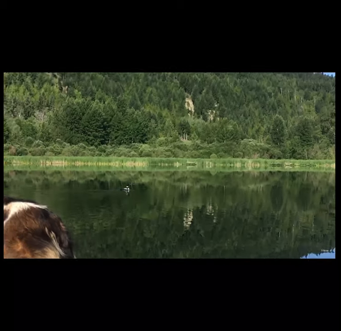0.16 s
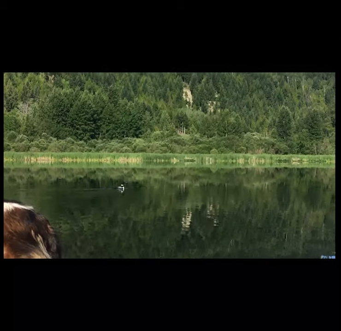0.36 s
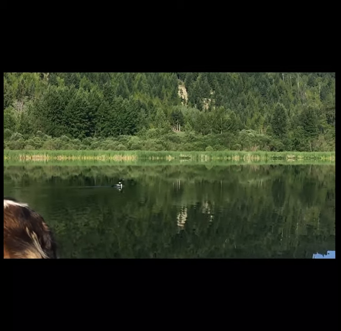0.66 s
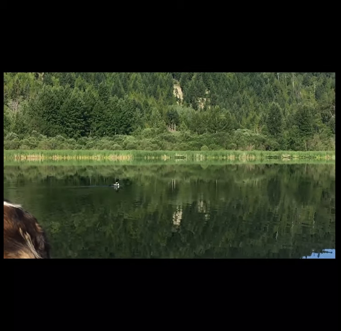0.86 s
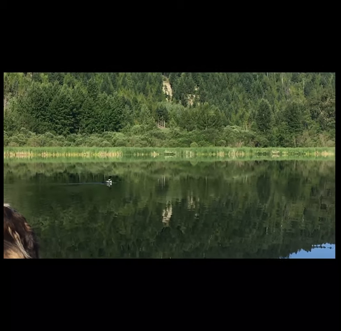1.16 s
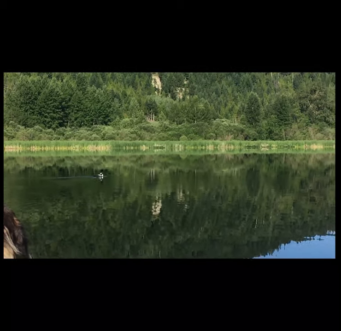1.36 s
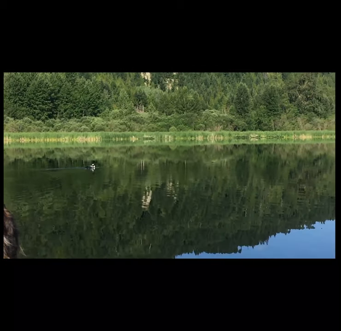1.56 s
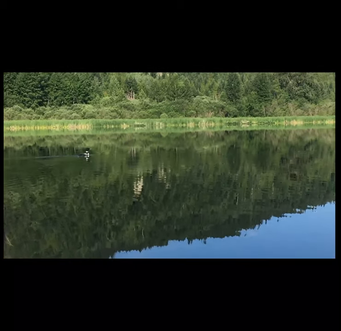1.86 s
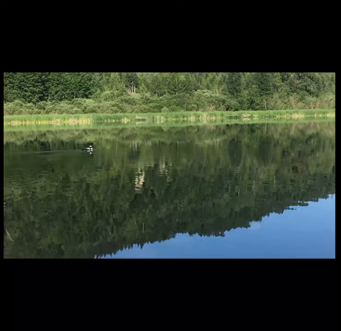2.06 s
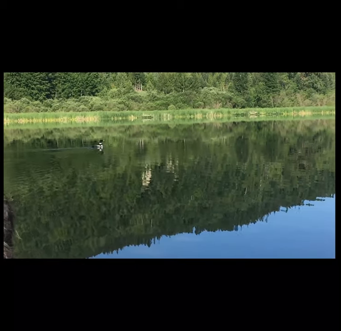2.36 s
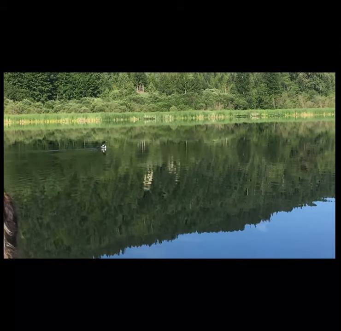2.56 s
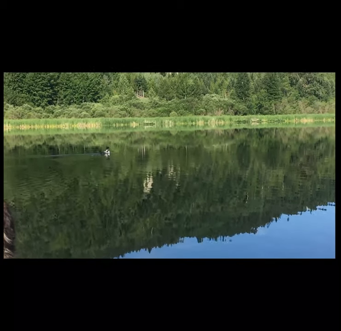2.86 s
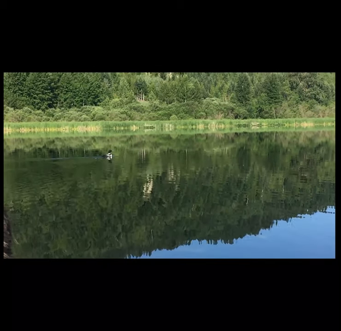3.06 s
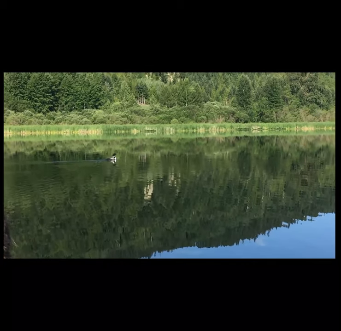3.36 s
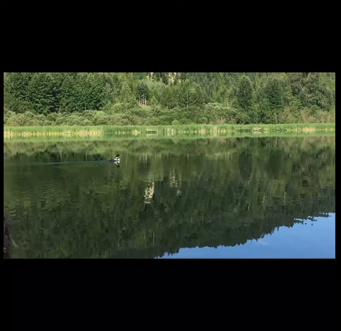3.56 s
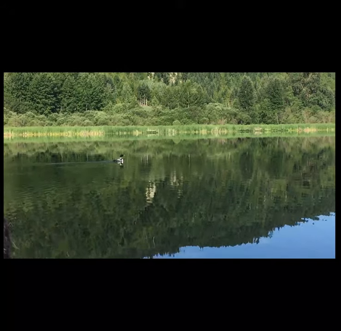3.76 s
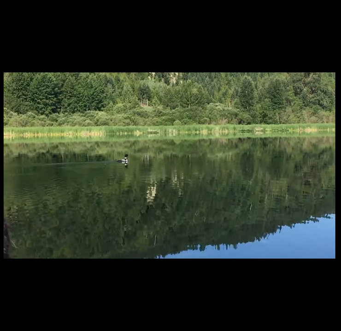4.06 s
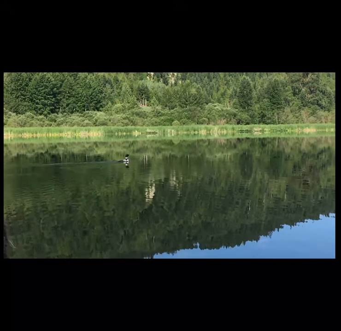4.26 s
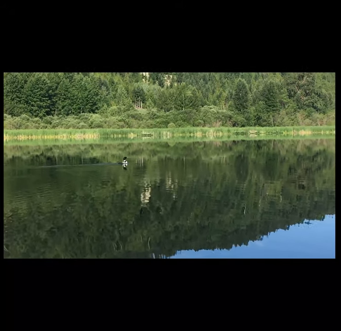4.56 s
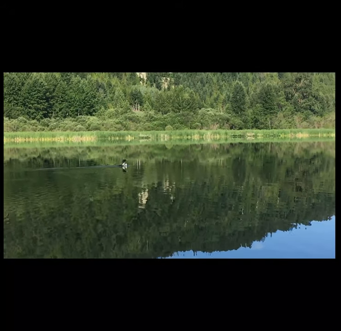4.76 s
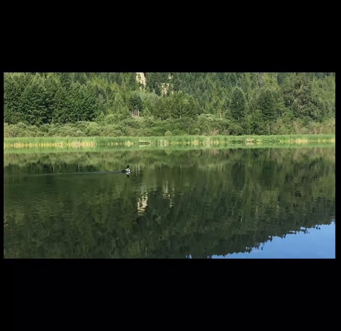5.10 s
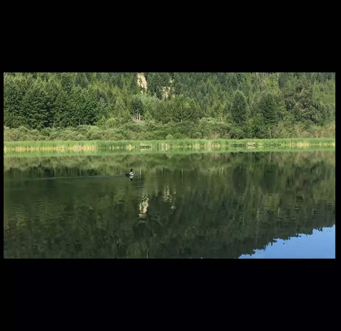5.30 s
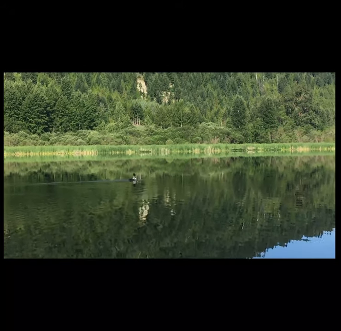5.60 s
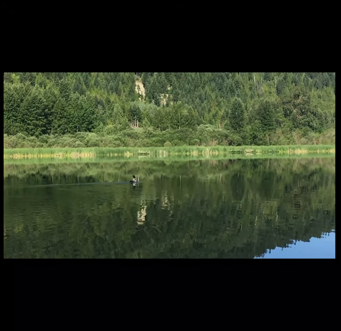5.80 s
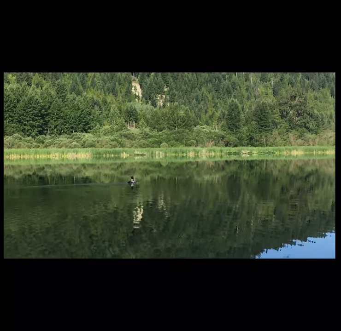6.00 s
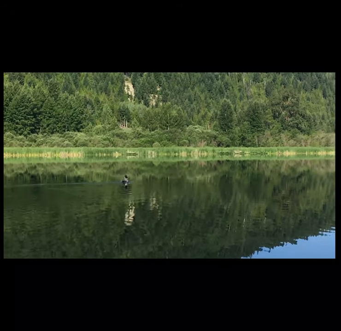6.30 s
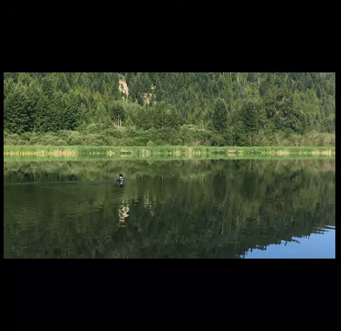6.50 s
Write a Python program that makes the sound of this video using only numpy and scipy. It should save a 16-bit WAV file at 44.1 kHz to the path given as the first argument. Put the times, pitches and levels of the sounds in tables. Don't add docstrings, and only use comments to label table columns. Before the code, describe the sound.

A far loon is already quavering as a dog scrambles at arm's length on a wooden boat, with clicks, rustle and hull thumps. A close loon then breaks from low pulsing into a loud, high tremolo, ending in a gulp. Far birds reply, and the exchange repeats twice more before a last close call begins. Soft lake hush, faint ticking and shore-bird twitters sit beneath; the hills return a long, faint echo.

```python
import sys
import numpy as np
from scipy import signal
from scipy.fft import rfft, irfft
from scipy.io import wavfile
from scipy.ndimage import uniform_filter1d

SR = 44100
rng = np.random.default_rng(int(sys.argv[2]) if len(sys.argv) > 2 else 0)


def attenuation_scalar(level_db):
    decades = np.asarray(level_db, float) / 20
    return 10 ** decades


def store_wav(level_fs):
    pcm = np.round(np.clip(np.atleast_2d(level_fs), -1, 1) * 32767)
    wavfile.write(sys.argv[1], SR, pcm.T.astype(np.int16))


N = 292824


def shape(points, hz):
    at, db = np.transpose(points)
    return np.interp(np.log(hz + 1), np.log(at), db)


def coloured(points):
    hz = np.arange(N // 2 + 1) * SR / N
    x = irfft(rfft(rng.standard_normal(N)) * attenuation_scalar(shape(points, hz)), N)
    return x / x.std()


def band(lo_hz, hi_hz):
    sos = signal.butter(2, [lo_hz, hi_hz], "bandpass", fs=SR, output="sos")
    x = signal.sosfilt(sos, rng.standard_normal(N))
    return x / x.std()


def walk(rate, size=N):
    k = int(SR / rate)
    held = np.repeat(rng.standard_normal(size // k + 1), k)
    return 1.3 * uniform_filter1d(uniform_filter1d(held, k), k)[:size]


def add(out, s, x):
    i = int(s * SR)
    out[i:i + len(x)] += x[:len(out) - i]


def ring(hz, t60):
    t = np.arange(int(t60 * SR)) / SR
    return np.sin(2 * np.pi * hz * t) * np.exp(-np.log(1000) * t / t60)


# pitch_hz, width_hz, level_db
FAR_HUM = [(58, 10, -71.5), (164.4, 5.2, -70), (229.8, 18, -72.5)]


def far_hum():
    return sum(attenuation_scalar(db) * band(hz - width / 2, hz + width / 2) for hz, width, db in FAR_HUM)


HISS_DB, FLICKER_DB = -73, 0.7
# freq_hz, density_db (per Hz)
HIGH_HISS = [(1650, -31), (2800, -13), (3160, 1), (3600, -4), (3870, -2), (4490, 1), (4900, -8),
             (5260, -6), (7860, -12), (8880, -10.5), (10400, -15.5), (15500, -14.5)]


def high_hiss():
    return attenuation_scalar(HISS_DB + FLICKER_DB * walk(5.8)) * coloured(HIGH_HISS)


LAKE_DB, LAP_DB = -60.5, 2.2
# freq_hz, density_db (per Hz)
LAKE_HUSH = [(15, -16.5), (25, -6.5), (71, 3), (129, -5), (240, -4), (421, -19.5), (784, -14.5),
             (920, -22.5), (1020, -9.5), (1190, -9.5), (1350, -21.5), (1600, -20.5), (2250, -19.5),
             (2800, -27), (6600, -120)]


def lake_hush():
    spectrum, hz = rfft(coloured(LAKE_HUSH)), np.arange(N // 2 + 1) * SR / N
    out, swell = 0, walk(2.327)
    for lo in 20 * 2.0 ** np.arange(10):
        octave = irfft(spectrum * ((hz >= lo) & (hz < 2 * lo)), N)
        lap_db = LAP_DB * (lo < 400) * (0.99 * swell + 1.1 * walk(5.9))
        out = out + octave * attenuation_scalar(lap_db + FLICKER_DB * walk(5.3))
    return attenuation_scalar(LAKE_DB) * out


TRILL_DB, TRILL_NOTE_S = -65, 0.017
# start_s, note_count, spacing_s, from_hz, to_hz
TRILLS = [
    (3.236, 11, .0272, 4300, 3050),
    (3.29, 9, .0275, 3250, 2850),
    (5.847, 6, .0235, 4300, 3400),
    (5.99, 7, .019, 4400, 3300),
]
# start_s, from_hz, to_hz, length_s, level_db
CHIPS = [(3.625, 4475, 4390, 0.044, -65), (4.79, 3400, 3630, 0.018, -68), (4.862, 3370, 3520, 0.018, -68),
         (4.925, 4800, 3090, 0.036, -61.5), (5.075, 3400, 3450, 0.017, -68),
         (5.135, 4630, 3600, 0.017, -64.5), (5.34, 3450, 3643, 0.015, -71), (5.412, 3400, 3500, .02, -71),
         (5.475, 4720, 3040, 0.04, -63.5), (5.628, 3260, 3450, 0.024, -63), (5.685, 4550, 3560, 0.026, -65),
         (5.885, 3200, 2960, 0.079, -60), (6.018, 4410, 4330, 0.022, -59.5), (6.022, 2870, 2710, 0.03, -61),
         (6.045, 3700, 2820, 0.015, -62), (6.142, 4670, 4380, 0.014, -64)]


def songbird():
    out = np.zeros(N)
    notes = []
    for s, count, gap, from_hz, to_hz in TRILLS:
        notes += [(s + k * gap, from_hz, to_hz, TRILL_NOTE_S, TRILL_DB) for k in range(count)]
    notes += CHIPS
    for s, from_hz, to_hz, length, db in notes:
        vary_hz, vary_db = rng.standard_normal(2)
        u = np.linspace(0, 1, int(length * SR))
        hz = (from_hz + (to_hz - from_hz) * u) * (1 + 0.015 * vary_hz)
        whistle = np.sin(np.pi * u ** 1.12) * np.sin(2 * np.pi * np.cumsum(hz) / SR)
        add(out, s, attenuation_scalar(db - 2 + 0.98 * vary_db) * whistle)
    out = out * attenuation_scalar(3 * walk(250))
    t = np.arange(SR // 4) / SR
    leaves = attenuation_scalar(-36) * np.exp(-t / 0.04) * rng.standard_normal(len(t))
    return out + signal.fftconvolve(out, leaves)[:N]


# start_s, peak_db
TICKS = [
    (0.5572, -52.5),
    (1.5631, -52),
    (2.5669, -51),
    (3.377, -52),
    (4.5757, -49),
    (5.5782, -52),
    (6.5818, -49),
]
# pitch_hz, level_db, t60_s
TICK_MODES = [(4500, 3, 0.022), (5670, 4, 0.0033), (6920, 3.5, 0.0078), (9250, -9.5, 0.0049)]


def ticks():
    out = np.zeros(N)
    for s, db in TICKS:
        for hz, mode_db, t60 in TICK_MODES:
            add(out, s, attenuation_scalar(db + mode_db - 7) * ring(hz, t60))
    return out


WHISK_S, WHISK_DB, WHISK_HZ = 6.09, -70.5, 11800


def whisk():
    gust = np.exp(-((np.arange(N) / SR - WHISK_S) / 0.015) ** 2)
    air = band(0.94 * WHISK_HZ, 1.08 * WHISK_HZ) + 0.8 * band(5000, 14000)
    return attenuation_scalar(WHISK_DB) * gust * air


SHIFT_ATTACK_DB_PER_S, FUR_FADE_DB_PER_S, HULL_FADE_DB_PER_S = 702.5, 300, 398.5
FUR_BODY_DB = 18
# freq_hz, density_db (per Hz)
FUR = [(120, -37.5), (200, -11), (478, -2), (624, -12), (990, -6), (1270, -6.5), (1880, -6), (2630, -20.5),
       (4330, -13.5), (14000, -50)]
# start_s, length_s, fur_db, hull_db
SHIFTS = [
    (0, .11, -68, -47.5),
    (0.134, .02, -73.5, -42),
    (0.2, .015, -65, -38),
    (0.214, 0.12, -63, -45),
    (0.407, 0.079, -63.5, -47),
    (0.55, 0.0098, -70.5, -36),
]


def dog_shifting():
    t = np.arange(N) / SR
    start, length, fur_db, hull_db = np.transpose(SHIFTS)[:, :, None]
    attack_db = SHIFT_ATTACK_DB_PER_S * np.maximum(start - t, 0)
    since_end = np.maximum(t - start - length, 0)
    rustle_db = np.max(fur_db - attack_db - FUR_FADE_DB_PER_S * since_end, axis=0)
    rumble_db = np.max(hull_db - attack_db - HULL_FADE_DB_PER_S * since_end, axis=0)
    grain_db = 1.68 * walk(200) + 2 * walk(42.1)
    fur = coloured(FUR) * attenuation_scalar(rustle_db + grain_db + FUR_BODY_DB)
    return fur + band(18, 145) * attenuation_scalar(rumble_db + 0.81 * walk(33.9))


HULL_T60_S, THUMP_HZ, THUMP_T60_S = 0.042, 58.3, 0.27
# start_s, peak_db, pitch_hz
CLAWS = [
    (0.0074, -29.5, 1500),
    (0.06, -39, 1880),
    (0.1164, -46, 1340),
    (0.203, -29, 2080),
    (0.2254, -33.5, 1840),
    (0.308, -33, 1420),
    (0.4051, -34, 1470),
    (0.4699, -22, 1660),
]
# start_s, peak_db, pitch_hz, thump_db (relative to the peak)
PAWS = [(0.018, -34.5, 535, -2), (0.148, -42.5, 450, 8.5), (0.204, -32, 296, -7), (0.343, -39.5, 260, -1.5),
        (0.395, -44.5, 620, 6.5), (0.529, -38, 524, -18), (0.559, -40, 253, 3.5), (0.64, -50.5, 518, -16.5),
        (0.705, -46, 274, -19), (0.929, -38.5, 314, -13), (1.096, -47.5, 278, -17),
        (1.175, -45.5, 545, -0.5), (1.311, -58, 250, 9), (1.681, -42, 504, -4.5), (2.179, -47, 441, -14),
        (2.263, -51, 330, -1.5), (2.292, -41, 320, -16.5), (2.671, -53.5, 298, -19),
        (2.759, -45.5, 244, -26), (3.829, -57, 244, 6.5)]


def paws():
    out = np.zeros(N)
    for s, db, hz in CLAWS:
        add(out, s, attenuation_scalar(db) * ring(hz, 0.01))
    for s, db, hz, thump_db in PAWS:
        add(out, s, attenuation_scalar(db) * ring(hz, HULL_T60_S))
        add(out, s, attenuation_scalar(db + thump_db) * ring(THUMP_HZ, THUMP_T60_S))
    return out


SHORE_DB, SHORE_T60_S = -27.5, 0.22
HILL_DB, HILL_DELAY_S, HILL_T60_S = -35, 0.32, 3.23


def echoes(voices):
    t = np.arange(3 * SR) / SR
    shore = attenuation_scalar(SHORE_DB) * np.exp(-np.log(1000) * t / SHORE_T60_S) / np.sqrt(SHORE_T60_S * SR / 14)
    arrival = np.clip(t / HILL_DELAY_S, 0, 1) ** 2
    hill = attenuation_scalar(HILL_DB) * arrival * np.exp(-np.log(1000) * t / HILL_T60_S) / np.sqrt(SR / 4)
    return signal.fftconvolve(voices, (shore + hill) * rng.standard_normal(len(t)))[:N]


def swing(s, t, turn_hz, low):
    place = np.minimum(np.interp(t, s, np.arange(len(s))), len(s) - 1.001)
    step, u = place.astype(int), place % 1
    if not low:
        return step + 0.5 - 0.5 * np.cos(np.pi * u)
    rise = np.where(step == len(s) - 2, u, np.sin(np.pi * u / 2))
    return step + np.where(np.diff(turn_hz)[step] > 0, rise, 1 - np.cos(np.pi * u / 2))


def cut(turns, start, end, low):
    turns = sorted(turns)
    s, hz, db = np.transpose(turns)
    ends = np.array([start, end])
    ends_hz = np.interp(swing(s, ends, hz, low), np.arange(len(s)), hz)
    first, last = np.transpose([ends, ends_hz, np.interp(ends, s, db)])
    margin_s = 0.004
    return [first] + [turn for turn in turns if start + margin_s < turn[0] < end - margin_s] + [last]


DIP_CLIMB_HZ, CREST_CLIMB_HZ, EARLY_FALL_S, RISE_S = 36.8, 65.35, 0.0019, 0.056


def opening(row, voice, breaks):
    start, dip_s, dip_hz, db, swell_db = row
    end = min([s for s in breaks if dip_s < s < dip_s + 2 * RISE_S], default=dip_s + RISE_S)
    turns = [(end, voice["break_hz"], db + voice["break_db"] + swell_db / 2)]
    for back in range(3):
        s, crest_db = dip_s - back * voice["arch_s"], db - back * swell_db
        crest_s = s - voice["fall_s"] - back * EARLY_FALL_S
        crest_hz = dip_hz + voice["arch_hz"] - back * CREST_CLIMB_HZ
        turns += [(s, dip_hz - back * DIP_CLIMB_HZ, crest_db - voice["low_dip_db"]), (crest_s, crest_hz, crest_db)]
    return cut(turns, start, min(end, N / SR), True)


SWING_S, RISE_SHARE = 0.097, 0.52
TIRED_S, TIRED_HZ, TIRED_DB, TIRED_DIP_DB = 0.017, 121.6, 3, 7.5
TIRING_RATIO = 0.3
LAST_FALL_S, LINGER_DB, WARM_S = 0.045, 5, 0.28


def tremolo(row, voice):
    start, s, crest_hz, db, tiring = row
    drag, linger = tiring ** voice["drag"], voice["linger_s"] * (1 - tiring)
    dip_db = db - voice["high_dip_db"]
    end_hz, end_db = voice["trough_hz"] - voice["sag_hz"], dip_db - TIRED_DIP_DB - 2 * TIRED_DB * tiring
    end = s + LAST_FALL_S + linger
    turns = [(s + LAST_FALL_S, end_hz, end_db), (end + 0.005, end_hz + 1, end_db - LINGER_DB)]
    for back in range(7):
        left = TIRING_RATIO ** back
        gap = SWING_S + TIRED_S * drag * left
        warm_db = voice["warm_db"] * np.exp(-max(s - start, 0) / WARM_S)
        trough_hz = voice["trough_hz"] - voice["sag_hz"] * drag * left
        turns += [(s, crest_hz - TIRED_HZ * tiring * left, db - TIRED_DB * tiring * left - warm_db),
                  (s - gap * RISE_SHARE, trough_hz, dip_db - TIRED_DIP_DB * drag * left ** 2)]
        s = s - gap
    return cut(turns, start, end, False)


REST_HZ, GULP_RISE_DB_PER_S = 576.6, 200.5
GULP_START, GULP_SETTLE = 0.43, 0.25


def gulp(row, voice):
    start, s, end, hz, db = row
    fade_db = voice["gulp_db_per_s"] * (end - s)
    return [(start, REST_HZ + GULP_START * (hz - REST_HZ), db - GULP_RISE_DB_PER_S * (s - start)),
            (s, hz, db),
            ((s + end) / 2, REST_HZ + GULP_SETTLE * (hz - REST_HZ), db - 0.6 * fade_db),
            (end, REST_HZ, db - fade_db)]


def calls(low, high, gulps, voice):
    breaks = [row[0] for row in high]
    notes = [opening(row, voice, breaks) for row in low]
    notes += [tremolo(row, voice) for row in high]
    notes += [gulp(row, voice) for row in gulps]
    return sorted(notes, key=lambda note: note[0][0])


LOW_SLOPE_DB, HIGH_SLOPE_DB = 2.1, -2
EFFORT = 0.45
BEAK_HZ, BEAK_WIDTH_HZ, TREBLE_HZ = 2220, 570, 4180
PATCHY_DB = 2.5
FAR_DULL_DB, FAR_KEYNOTE_DB = -30, 1
KEYNOTE_HOLD = 0.52
# freq_hz, level_db
WINDPIPE = [(750, -6), (1150, 3), (1750, 3), (1900, -25), (2200, -9.5), (2450, -26), (2850, -60),
            (3400, -21.5), (3780, -38.5), (4330, -20.5), (4850, -45), (5280, -33.5), (5900, -47),
            (7200, -68)]


def partials(hz, slack_db, posture, low, far):
    stretch, bright_db, beak_db, treble_db = posture
    lead = 2 if low else 1
    slope_db = bright_db + far * FAR_DULL_DB + (LOW_SLOPE_DB if low else HIGH_SLOPE_DB)
    phase, tone = 2 * np.pi * np.cumsum(hz) / SR, 0
    for k in range(1, 10):
        part_db = shape(WINDPIPE, k * hz * stretch) - shape(WINDPIPE, lead * hz * stretch)
        if k > lead:
            part_db += (slope_db + EFFORT * slack_db) * (k - lead) ** 0.78
            part_db += beak_db * np.exp(-((k * hz - BEAK_HZ) / BEAK_WIDTH_HZ) ** 2)
            part_db += treble_db * (1 + np.tanh((k * hz - TREBLE_HZ) / 200)) / 2
            part_db += PATCHY_DB * (k > 2) * walk(25.3, size=len(hz))
        if k < lead:
            part_db += far * FAR_KEYNOTE_DB - KEYNOTE_HOLD * slack_db
        tone = tone + attenuation_scalar(uniform_filter1d(part_db, size=200)) * np.sin(k * phase + k * k / 3)
    if low:
        halves = np.sin(3 * phase / 2) + np.sin(5 * phase / 2) / 3
        tone = tone + attenuation_scalar(HALF_LINE_DB + 4 * walk(15, size=len(hz))) * halves
    return tone


REGISTER_BREAK_HZ, HALF_LINE_DB, ONSET_S = 920, -36, 0.011
CATCH_S, CATCH_DEPTH = 0.0036, 0.53
HICCUP_HZ, HICCUP_DB, HICCUP_S = 970, -8, 0.0068
CHOKE_S, CHOKE_DEPTH = 0.011, 0.55
CRACK_DB, CRACK_S = -18, 0.022
SHIMMER_DB, BREATH_DB = 0.45, -32.5
AIRFLOW_DB = -50


def loon(notes, postures, far):
    out, shimmer, breath = np.zeros(N), attenuation_scalar(SHIMMER_DB * walk(60)), band(54, 230)
    rasp, airflow = band(800, 1500), band(4000, 4700)
    top_db = max(row[2] for note in notes for row in note)
    for note, posture in zip(notes, postures):
        s, turn_hz, turn_db = np.transpose(note)
        t = np.arange(max(s[0] - ONSET_S / 2, 0), s[-1] + ONSET_S / 2, 1 / SR)
        low = turn_hz.mean() < REGISTER_BREAK_HZ
        breaks_up = low and turn_hz[-1] > turn_hz[-2]
        turn = np.arange(len(s))
        hz = np.interp(swing(s, t, turn_hz, low), turn, turn_hz)
        power = 1.5 if low else 2.4
        push = np.interp(swing(s, t, turn_hz, False), turn, attenuation_scalar(turn_db) ** power) ** (1 / power)
        tone = partials(hz, 20 * np.log10(push) - top_db, posture, low, far)
        if low:
            slope = np.diff(turn_hz)
            u = np.arange(int(HICCUP_S * SR)) / SR
            hiccup = np.sin(np.pi * u / HICCUP_S) ** 2 * np.sin(2 * np.pi * HICCUP_HZ * u)
            for k in np.flatnonzero((slope[:-1] < 0) & (slope[1:] > 0)) + 1:
                tone = tone * (1 - CATCH_DEPTH * np.exp(-((t - s[k]) / CATCH_S) ** 2))
                add(out, min(s[k] - HICCUP_S / 2, N / SR), attenuation_scalar(turn_db[k + 1] + HICCUP_DB) * hiccup)
        if breaks_up:
            tone = tone * (1 - CHOKE_DEPTH * np.exp(-((t - s[-1]) / CHOKE_S) ** 2))
        tone = tone + attenuation_scalar(AIRFLOW_DB) * (1 - far) * airflow[:len(t)]
        edge = np.sin(np.pi / 2 * np.clip(np.minimum(t - t[0], t[-1] - t) / ONSET_S, 0, 1)) ** 2
        add(out, t[0], 2 * push * edge * tone)
        if breaks_up and s[-1] < N / SR - CRACK_S:
            u = np.arange(-3 * CRACK_S, 3 * CRACK_S, 1 / SR)
            crack = np.exp(-(u / CRACK_S) ** 2) * rasp[int(s[-1] * SR):][:len(u)]
            add(out, s[-1] + u[0], attenuation_scalar(turn_db[-1] + CRACK_DB) * crack)
    return out * shimmer * (1 + attenuation_scalar(BREATH_DB) * breath)


# start_s, last_dip_s, dip_hz, last_crest_db, swell_db (per arch)
MATE_LOW = [
    (1.356, 1.431, 616, -50.5, 5),
    (3.555, 3.649, 656, -47, -1.5),
    (5.625, 5.695, 628, -51, -0.3),
]
THIRD_LOW = [
    (1.408, 1.489, 724, -57.5, 0.15),
    (1.69, 1.69, 740, -59, .1),
    (1.797, 1.797, 677, -59, .1),
    (3.895, 4.046, 739, -55.5, 5.5),
]
# start_s, last_crest_s, fresh_crest_hz, crest_db, tiring (0-1)
MATE_HIGH = [
    (0, 0.397, 1164, -38, 0.53),
    (1.49, 1.997, 1160, -42.5, .99),
    (3.688, 3.995, 1165, -41.5, 0.16),
    (5.754, 6.15, 1160, -41.5, 0.3),
    (6.491, 6.548, 1123, -55, .01),
]
THIRD_HIGH = [
    (1.54, 1.63, 1271, -38.5, 0.089),
    (1.728, 1.733, 1277, -41, 0.013),
    (1.853, 1.857, 1286, -50.5, .01),
    (4.095, 4.289, 1252, -40.5, 0.089),
]
# start_s, crest_s, end_s, crest_hz, crest_db
MATE_GULPS = [
    (3.488, 3.494, 3.53, 680, -59),
    (6.206, 6.252, 6.285, 620, -63),
]
THIRD_GULPS = [
    (4.348, 4.402, 4.49, 841, -59.5),
]
MATE_VOICE = dict(arch_s=0.096, fall_s=.058, arch_hz=103.4, break_hz=845, low_dip_db=19.5, break_db=2, trough_hz=953, sag_hz=49.7, high_dip_db=11.5, warm_db=2.5, drag=0.5, linger_s=0.035, gulp_db_per_s=200)
THIRD_VOICE = dict(arch_s=0.068, fall_s=0.055, arch_hz=117.7, break_hz=910, low_dip_db=7, break_db=3, trough_hz=978, sag_hz=3.3, high_dip_db=12, warm_db=1.5, drag=0.79, linger_s=0.0036, gulp_db_per_s=186.5)


def far_loons():
    level_head = [(0.95, 0.0051, 0, 0)] * 20
    mate = loon(calls(MATE_LOW, MATE_HIGH, MATE_GULPS, MATE_VOICE), level_head, 1)
    third = loon(calls(THIRD_LOW, THIRD_HIGH, THIRD_GULPS, THIRD_VOICE), level_head, 1)
    return mate + third


# start_s, last_dip_s, dip_hz, last_crest_db, swell_db (per arch)
NEAR_LOW = [
    (.262, .408, 677.5, -28.5, 6),
    (1.963, 2.131, 674.4, -28, 5.5),
    (4.028, 4.207, 696.3, -30, 0.5),
    (6.52, 6.674, 679.6, -29, 4),
]
# start_s, last_crest_s, fresh_crest_hz, crest_db, tiring (0-1)
NEAR_HIGH = [
    (0.468, 0.658, 1187, -25.5, 0.39),
    (2.177, 2.489, 1182, -27, 0.92),
    (4.253, 4.567, 1193, -25.5, 0.97),
]
# start_s, crest_s, end_s, crest_hz, crest_db
NEAR_GULPS = [
    (0.727, .765, .865, 753.7, -32.5),
    (2.535, 2.533, 2.565, 626, -54.5),
    (4.599, 4.6, 4.632, 658, -50.5),
]
# windpipe_stretch (ratio), brightness_db (per partial), beak_db, treble_db
NEAR_POSTURE = [
    (1.03, 1.9, -7.5, -10),
    (0.995, -0.5, -6.5, 4),
    (1.026, 3, -6.5, 3),
    (1.015, 2, -0.5, -11.5),
    (0.981, 0.34, 2, -1),
    (1.4, -9, -8, 3),
    (1.02, 3.3, 3, -15.5),
    (0.98, -1.9, 2, 1),
    (1.3, -8.5, -13, 1.5),
    (1.02, -2, 2, -12),
]
NEAR_VOICE = dict(arch_s=.093, fall_s=.044, arch_hz=133, break_hz=875.6, low_dip_db=14.5, break_db=-1, trough_hz=968, sag_hz=22, high_dip_db=5, warm_db=1, drag=0.97, linger_s=0.047, gulp_db_per_s=421.5)


def near_loon():
    return loon(calls(NEAR_LOW, NEAR_HIGH, NEAR_GULPS, NEAR_VOICE), NEAR_POSTURE, 0)


FAR_WET_DB = 4.5


def scene():
    background = lake_hush() + far_hum() + high_hiss() + songbird()
    boat = ticks() + whisk() + dog_shifting() + paws()
    far, near = far_loons(), near_loon()
    return (background + boat + echoes(near + attenuation_scalar(FAR_WET_DB) * far) + far + near)[None]


# centre_s, above_hz, half_length_s
TREBLE_DROPOUTS = [(.515, 4600, .025), (.587, 4600, .025), (1.33, 2500, .02), (1.372, 3000, .02),
                   (1.415, 2500, .025), (1.52, 2500, .02), (1.69, 2500, .022), (2.225, 4800, .02),
                   (2.7, 3000, .035), (3.186, 3800, .02), (3.314, 4500, .02), (3.442, 4800, .02),
                   (3.485, 4800, .02), (3.548, 4800, .025), (4.936, 5000, .02), (5.47, 4800, .02),
                   (5.745, 4800, .022), (6.045, 4800, .02), (6.25, 3000, .045)]


def drop_treble(out):
    for s, hz, length in TREBLE_DROPOUTS:
        span = slice(int((s - length) * SR), int((s + length) * SR))
        sos = signal.butter(6, hz, "highpass", fs=SR, output="sos")
        treble = signal.sosfiltfilt(sos, out[:, span])
        gate = np.clip(2.2 * np.hanning(treble.shape[1]) - 1, 0, 0.9)
        out[:, span] -= gate * treble
    return out


def top_cut(x):
    return signal.sosfilt(signal.butter(12, 15690, fs=SR, output="sos"), x)


def record(dry):
    rumble_cut = signal.butter(2, 36, "highpass", fs=SR, output="sos")
    mix = drop_treble(signal.sosfilt(rumble_cut, dry))
    return top_cut(mix)


dry = scene()
out = record(dry)
store_wav(out)
```